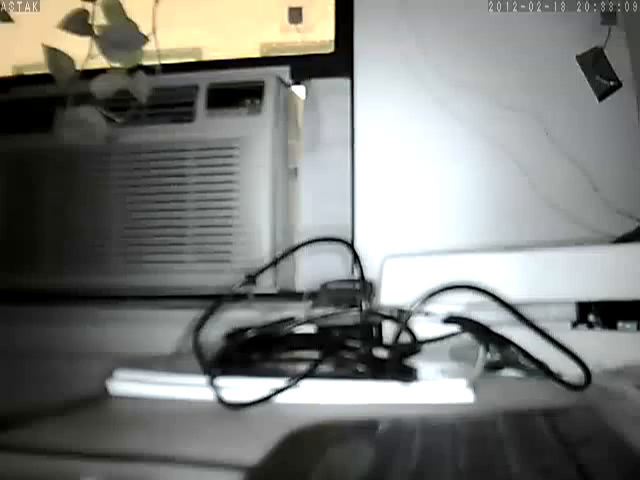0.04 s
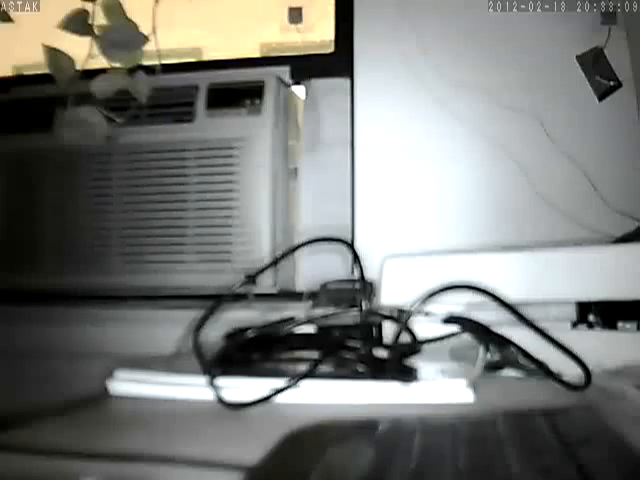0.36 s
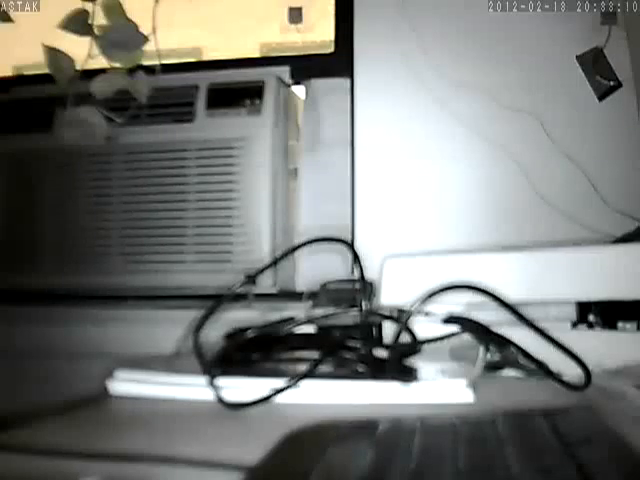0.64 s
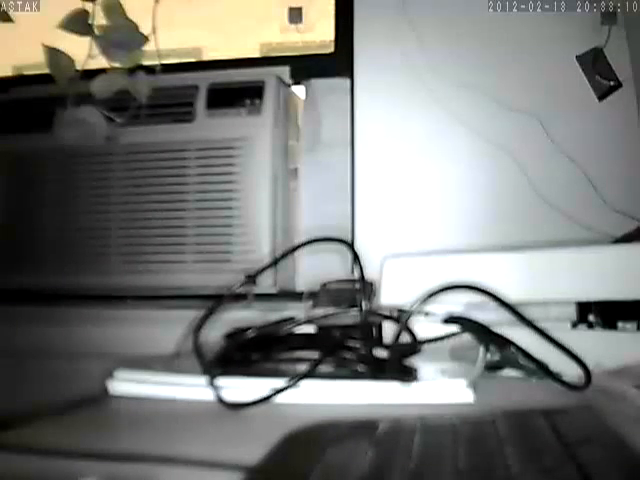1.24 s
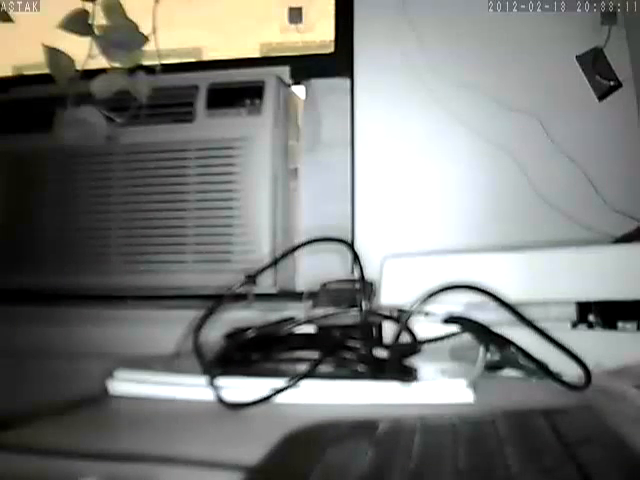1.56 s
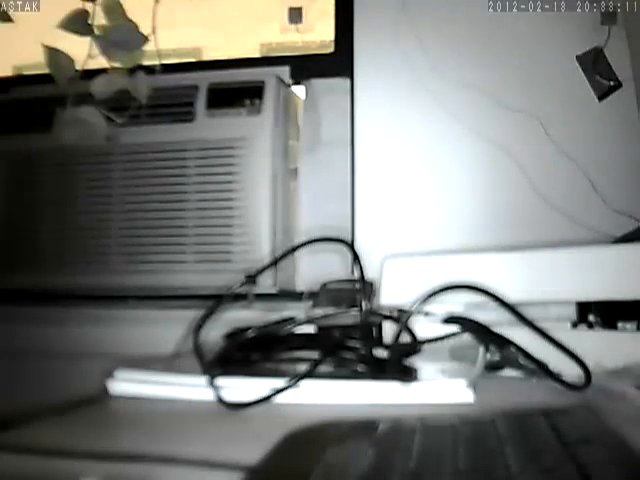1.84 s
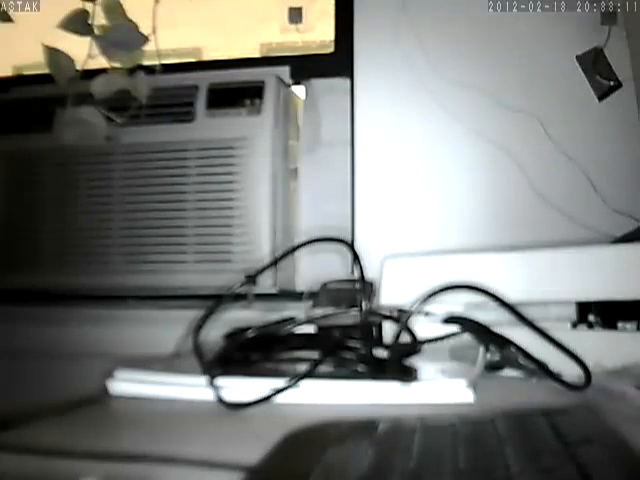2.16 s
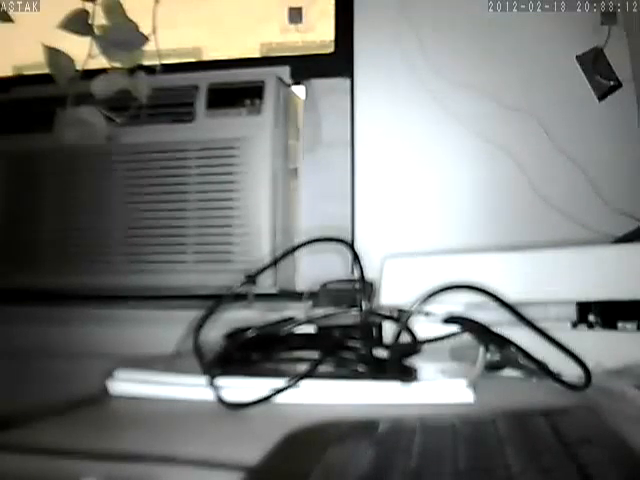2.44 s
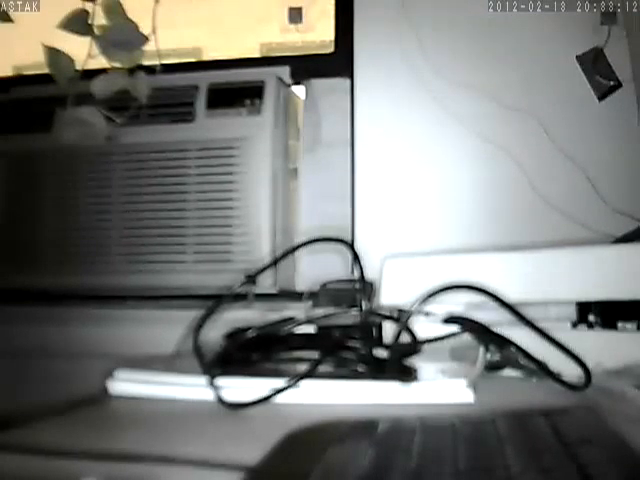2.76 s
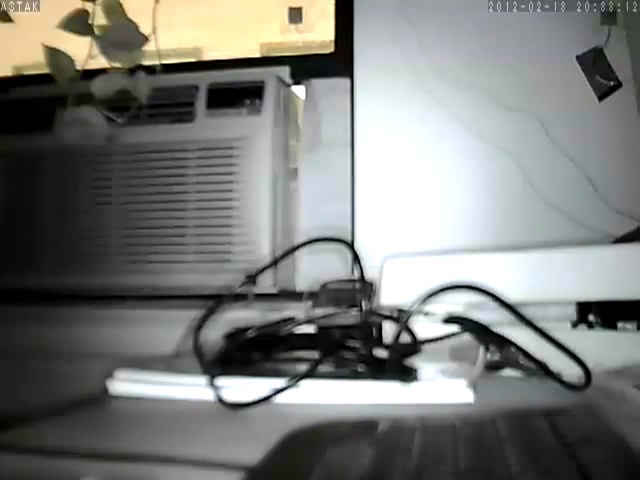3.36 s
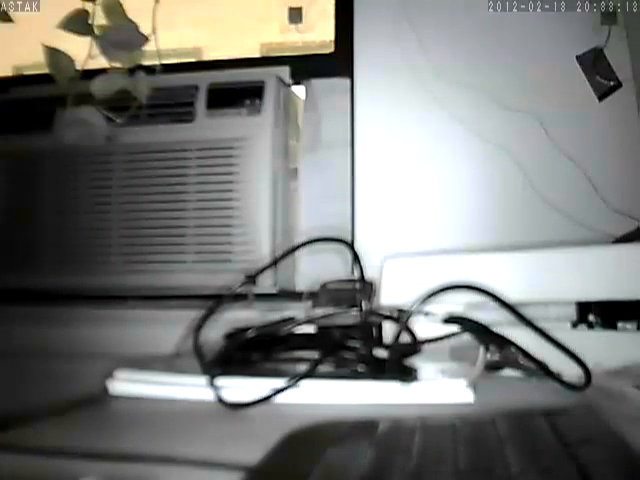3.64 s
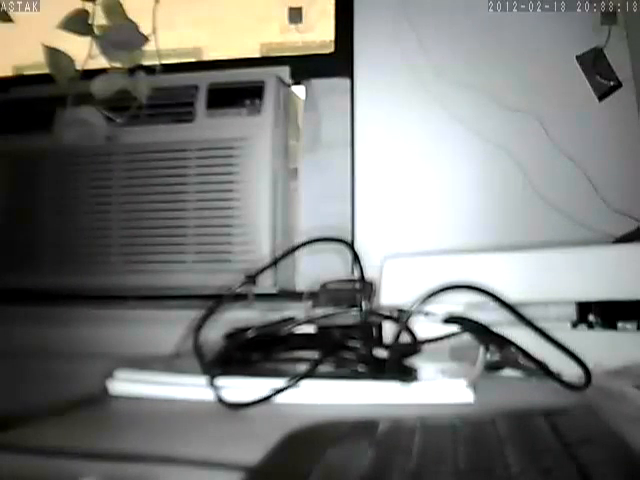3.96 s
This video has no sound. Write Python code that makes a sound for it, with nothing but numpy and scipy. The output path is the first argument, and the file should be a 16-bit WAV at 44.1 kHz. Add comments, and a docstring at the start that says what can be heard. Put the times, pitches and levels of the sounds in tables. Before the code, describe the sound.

An air conditioner runs, its fan blowing over a deep, unevenly throbbing drone.

```python
"""A window air conditioner runs in a small quiet room, near a dull little microphone.
From the start its blower pushes air through the resonant cabinet and sounds multiples of its shaft rate,
the motors hum on mains harmonics and whine faintly, and the deep compressor drone swells and sinks
unevenly. At about 1 s the blade tone grows louder; it sags, then rises again by 2.5 s and holds."""
import sys
import numpy as np
from scipy import signal
from scipy.fft import rfft, irfft
from scipy.io import wavfile

SR = 44100
rng = np.random.default_rng(int(sys.argv[2]) if len(sys.argv) > 2 else 0)


def digitize_waveform(pressure):
    """Quantize a signal to 16-bit integers and store it at the path in sys.argv[1].

    Rows of a 2-D input are taken as channels; values are limited to [-1, 1].
    """
    field = np.atleast_2d(pressure).T
    bounded = np.clip(field, -1, 1)
    quanta = np.round(bounded * 32767).astype(np.int16)
    wavfile.write(sys.argv[1], SR, quanta)


N = 176400


def amp(db):
    """Decibels to gain."""
    return 10 ** (np.asarray(db) / 20)


def drift(rate_hz):
    """Smooth random curve, unit spread, about rate_hz changes a second."""
    hz = np.fft.rfftfreq(N, 1 / SR)
    curve = irfft(rfft(rng.standard_normal(N)) * (hz > 0) / (1 + (2 * hz / rate_hz) ** 4), N)
    return curve / curve.std()


def rotation(hz, wander):
    """Angle in radians of a rotation whose speed drifts by the fraction wander."""
    return 2 * np.pi * np.cumsum(hz * (1 + wander * drift(2))) / SR


def harmonics(angle, orders, levels_db, waver_db):
    """Sines on multiples of one rotation, each wavering in level."""
    return sum(amp(db + waver_db * drift(6.4)) * np.sin(order * angle + rng.uniform(0, 2 * np.pi))
               for order, db in zip(orders, levels_db))


# freq_hz, density_db (per Hz, before the cabinet)
AIR_SPECTRUM = [(10, -63.5), (24, -59.5), (36, -59.5), (70, -59.5), (105, -63.5), (150, -66), (190, -63.5),
                (240, -59), (330, -62.5), (450, -63), (700, -62.5), (830, -63), (900, -71.5), (1080, -77),
                (1280, -83), (1700, -83.5), (2170, -81.5), (2700, -93.5), (3400, -93.5), (3950, -107.5),
                (4600, -112.5), (5000, -126)]
# centre_hz, width_hz, lift_db
CABINET_RESONANCES = [(56.5, 5, 3.5), (116.6, 3.3, 10), (205, 12, 2.5), (240, 12, 4.5), (275, 43, 4.5),
                      (381, 26, 3.5), (497, 34, 2.5), (578, 64, 6.5), (784.4, 36, 5), (921, 18, 4.5),
                      (989, 50, 7.5), (1092, 17, 4), (1193, 28, 5), (1510, 150, 3.5), (1968, 105, 6.5),
                      (3090, 170, 2.5)]


def airflow():
    """Turbulent air rings the cabinet and grille; the flow surges slowly and flutters quickly."""
    hz = np.maximum(np.fft.rfftfreq(N, 1 / SR), 1)
    freq_hz, density_db = np.array(AIR_SPECTRUM).T
    spectrum_db = np.interp(np.log(hz), np.log(freq_hz), density_db)
    for centre_hz, width_hz, lift_db in CABINET_RESONANCES:
        spectrum_db += lift_db / (1 + (2 * (hz - centre_hz) / width_hz) ** 2)
    rush = irfft(rfft(rng.standard_normal(N)) * amp(spectrum_db), N) * np.sqrt(SR / 2)
    surge_db = 0.13 * drift(rate_hz=5.9)
    flutter_db = 0.4 * drift(rate_hz=69)  # eddies behind the blades
    return rush * amp(surge_db + flutter_db)


# shaft_multiple
WHEEL_ORDERS = [1, 5, 9, 10]
# peak_db, one per order
WHEEL_LEVELS_DB = [-36, -41, -47.5, -48.5]
# time_s, peak_db
BLADE_ENVELOPE = [(0, -43.5), (0.85, -43), (1.05, -34.5), (2.15, -39), (2.5, -35.5), (4, -34.5)]


def blower(t):
    """The unbalanced wheel sounds multiples of the shaft rate; its passing blades add one more tone."""
    shaft_hz, blade_count = 17.527, 15
    angle = rotation(shaft_hz, wander=0.0005)
    time_s, peak_db = np.array(BLADE_ENVELOPE).T
    blade_db = np.interp(t, time_s, peak_db)
    blades = harmonics(angle, [blade_count], [blade_db], waver_db=0.6)
    wheel = harmonics(angle, WHEEL_ORDERS, WHEEL_LEVELS_DB, waver_db=1.3)
    return wheel + blades


# mains_multiple
HUM_ORDERS = [2, 3, 4, 6]
# peak_db, one per order
HUM_LEVELS_DB = [-44.5, -54.5, -49, -46]


def motor_hum(t):
    """The windings buzz on harmonics of the mains."""
    mains_hz = 59.97
    return harmonics(2 * np.pi * mains_hz * t, HUM_ORDERS, HUM_LEVELS_DB, waver_db=1.6)


# pitch_hz, peak_db
WHINE_TONES = [(1509, -71), (1811.6, -72.5), (1916.3, -71), (1978.5, -68.5), (1989, -69.5), (2090, -70.5),
               (3046, -82)]


def motor_whine():
    """Faint high motor tones, nearly steady in pitch."""
    return sum(amp(peak_db) * np.sin(rotation(pitch_hz, wander=0.0002))
               for pitch_hz, peak_db in WHINE_TONES)


# time_s, rms_db (before trim)
DRONE_ENVELOPE = [(0.05, -36), (0.14, -31.5), (0.27, -42), (0.44, -29.5), (0.52, -31), (0.67, -27.5),
                  (0.86, -45), (1.04, -28), (1.13, -35.5), (1.35, -30.5), (1.42, -48), (1.49, -38),
                  (1.62, -32), (1.71, -55.5), (1.78, -32), (1.85, -47), (1.92, -28.5), (2.31, -30.5),
                  (2.48, -51), (2.61, -30), (3.29, -37), (3.34, -55.5), (3.42, -49), (3.47, -31),
                  (3.82, -26), (3.94, -48), (3.99, -40)]


def compressor(t):
    """A deep drone just under the mains frequency, throbbing unevenly."""
    pitch_hz, trim_db = 59.3, -2.5
    time_s, rms_db = np.array(DRONE_ENVELOPE).T
    envelope = np.sqrt(2) * np.interp(t, time_s, amp(rms_db + trim_db))
    return envelope * np.sin(rotation(pitch_hz, wander=0.0073))


def scene():
    """Air, blower, motors and compressor, summed to mono."""
    t = np.arange(N) / SR
    return (airflow() + blower(t) + motor_hum(t) + motor_whine() + compressor(t))[None]


def record(dry):
    """The microphone opens after an instant and passes no high treble."""
    start_s, fade_s, cutoff_hz = 0.0345, 0.001, 5000
    fade_in = np.clip((np.arange(N) / SR - start_s) / fade_s, 0, 1)
    lowpass = signal.ellip(8, 0.2, 70, cutoff_hz, fs=SR, output="sos")
    return signal.sosfilt(lowpass, dry * fade_in)


dry = scene()
out = record(dry)
digitize_waveform(out)
```